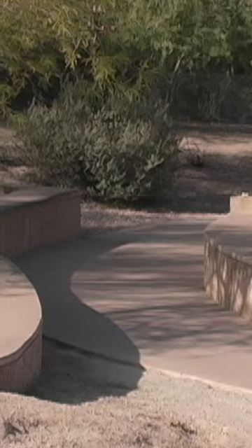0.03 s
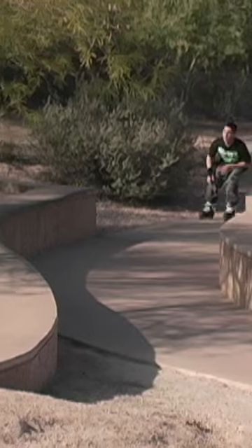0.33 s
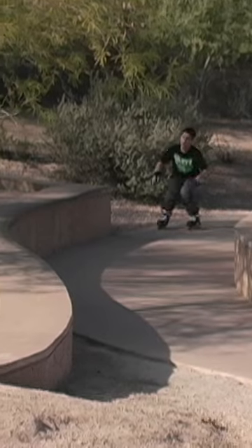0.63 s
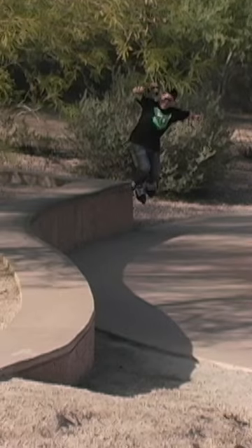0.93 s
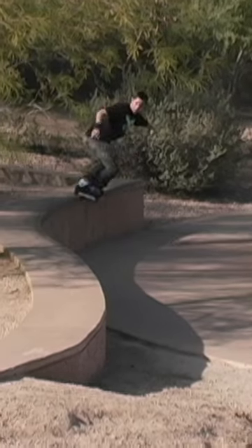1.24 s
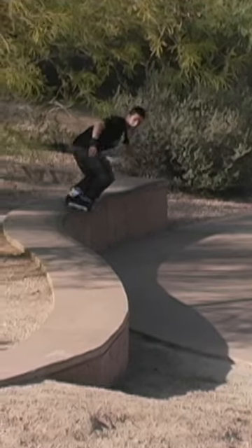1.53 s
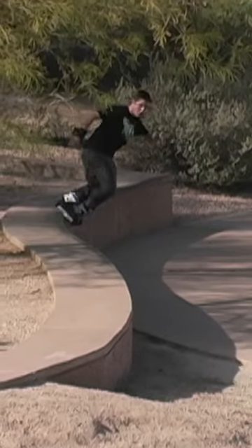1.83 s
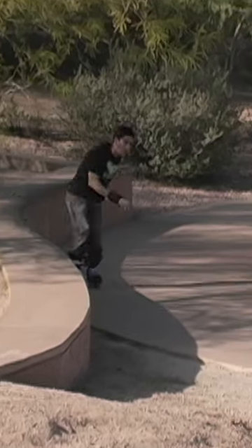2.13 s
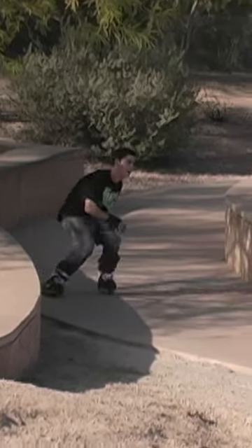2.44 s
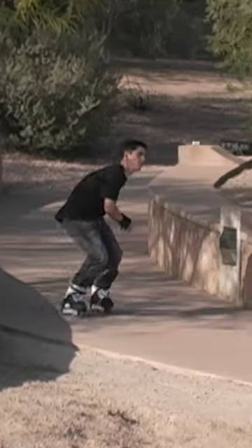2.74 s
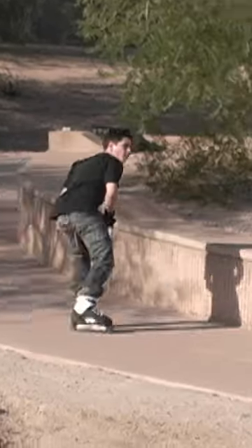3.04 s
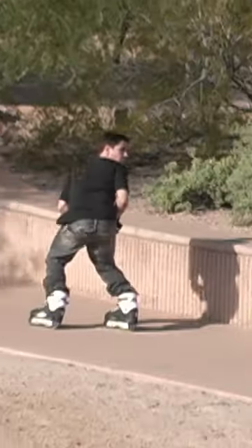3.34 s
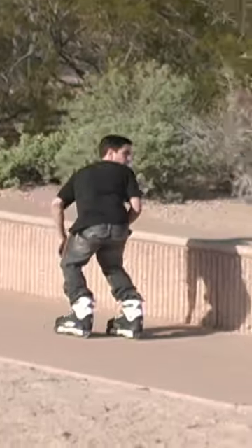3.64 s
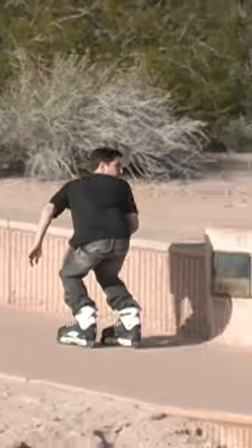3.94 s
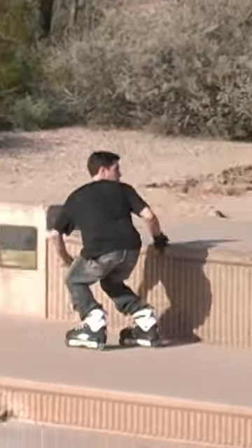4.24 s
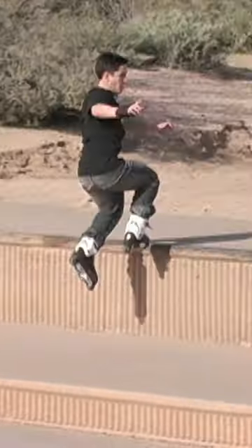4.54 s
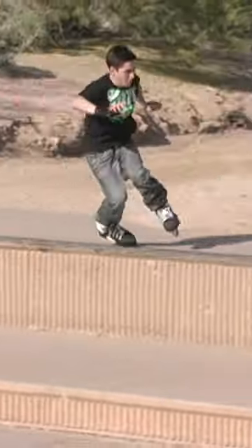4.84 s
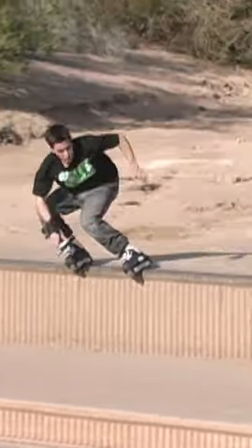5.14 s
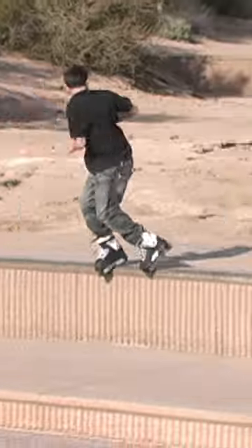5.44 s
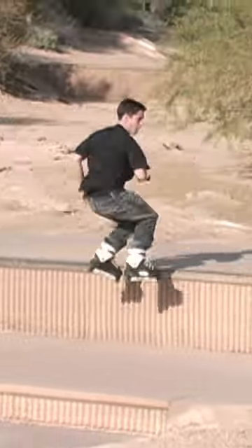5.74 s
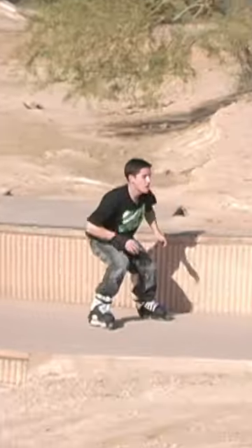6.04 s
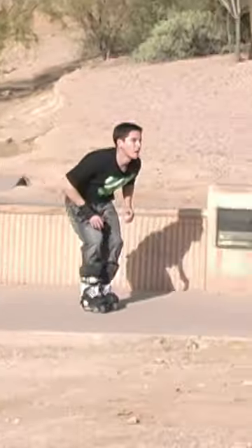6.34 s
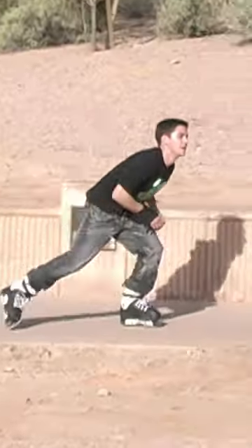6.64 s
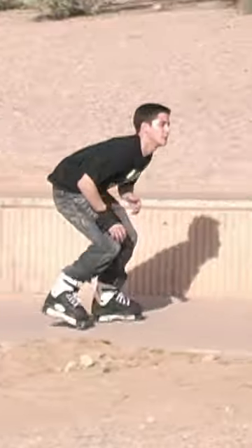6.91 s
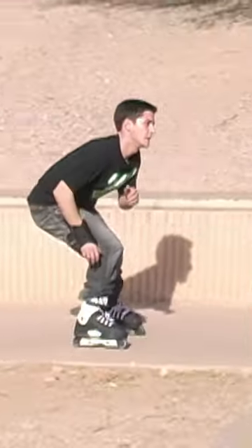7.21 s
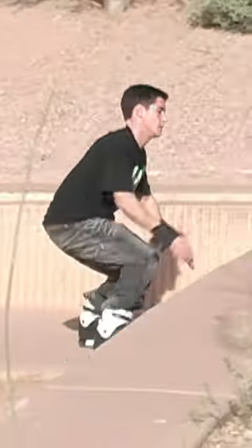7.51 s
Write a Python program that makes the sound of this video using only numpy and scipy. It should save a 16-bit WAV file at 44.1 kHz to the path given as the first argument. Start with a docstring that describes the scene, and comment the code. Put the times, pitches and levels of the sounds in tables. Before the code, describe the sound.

Inline skates roll over concrete, grind along ledges twice and land with a hard clack before rolling on.

```python
"""An inline skater rolls in over concrete, wheels rumbling and ticking across a joint, and jumps.
At 1.2 s his plastic soles bite into a ledge and grind, groaning and scraping as they stick and slip.
He drops off, rolls over more joints, and at 4.7 s locks on again for a second, two-part grind.
At 6 s he lands with a hard clack and strides on. All along a low wall throws back a short echo,
over far traffic, a distant engine's hum and a faint high whine. Only the left channel sounds."""
import sys
import numpy as np
from scipy import signal
from scipy.fft import rfft, irfft, next_fast_len
from scipy.io import wavfile
from scipy.ndimage import map_coordinates

SR = 44100
rng = np.random.default_rng(int(sys.argv[2]) if len(sys.argv) > 2 else 0)


def wrap_up_sound(samples):
    """Save the sound to the file named by the first command line argument, as 16-bit audio."""
    columns = np.atleast_2d(samples).T
    # keep every value between -1 and 1, then stretch to whole-number steps
    tamed = np.clip(columns, -1, 1)
    steps = np.round(tamed * 32767).astype(np.int16)
    wavfile.write(sys.argv[1], SR, steps)


N = 342657
TIME = np.arange(N) / SR
MS = 1 / 1000


# soles sliding on the ledge: lock-on t/s, release t/s, groan level/dB, scrape level/dB,
# load drift/(dB/s), pitch factor of the sole
SLIDES = [(1.208, 1.96, -48.5, -54, 9.5, 1.02), (4.723, 4.906, -46, -51.5, -20, 1.07),
          (4.992, 5.473, -38.5, -43.5, -6.5, 1.02)]
def sole_load():
    """Groan and scrape envelopes: the load drifts through each slide, and the first lock-on digs in."""
    groan, scrape = np.zeros((2, N))
    for start, end, groan_db, scrape_db, db_per_s, _ in SLIDES:
        drift = amp(db_per_s * (np.clip(TIME, start, end) - start))
        load = contact_gain(start, end, attack_s=0.0099, release_s=0.041) * drift
        groan += load * amp(groan_db)
        scrape += load * amp(scrape_db)
    bite_db = 12.5 * swell(SLIDES[0][0], half_width_s=0.16)
    return groan * amp(0.4 * bite_db), scrape * amp(bite_db)


def sole_pitch(sag_per_s=0.11):
    """Pitch bend of the sole: it resets at each lock-on and sags as the slide slows."""
    pitch = np.ones(N)
    for start, end, *_, factor in SLIDES:
        sag = np.exp(-sag_per_s * (np.clip(TIME, start, end) - start))
        pitch = np.where(TIME >= start, factor * sag, pitch)
    return pitch


# resonances of the plastic sole pressed on the edge: f/Hz, width/Hz, level/dB
SOLE_MODES = [(576, 220, -1), (997, 51, -3), (1415, 130, 1), (1662, 130, 1), (2290, 96, -0.5)]
# EQ of the boot's groan: f/Hz, level/dB
GROAN_EQ = [(60, 3.5), (140, 12), (230, 12.5), (340, -2.5), (560, 6), (780, -3), (1000, 5), (1400, 10),
            (1900, 7), (2300, -6), (2800, -22), (6000, -41)]
# EQ of the edge's scrape: f/Hz, level/dB
SCRAPE_EQ = [(1500, -14), (2600, -3), (3400, 4.5), (4200, 0.5), (5000, 3.5), (6500, -0.5), (8000, -3),
             (9200, -3.5), (10500, -8.5), (12200, -6), (15000, -30)]
# how keenly the edge cuts, from dull bite to sandy hiss: t/s, treble tilt/dB
KEENNESS = [(1.2, -18), (1.55, -2.5), (4.75, 7.5), (5.05, 10.5), (5.5, 1.5)]
def grinding():
    """Soles stick and slip on the ledge: a groan of wavering resonances under the scrape of the edge."""
    groan_gain, scrape_gain = sole_load()
    stick_slip, pitch = amp(2 * wobble(130)), sole_pitch()
    rub = asperities(per_s=1200, spread_db=4, smooth=0.11) * stick_slip
    sole = np.zeros(N)
    for hz, width_hz, db in SOLE_MODES:
        gain = amp(db + 1.6 * wobble(8.4))
        sole += gain * resonance(rub, hz * pitch * (1 + 0.035 * wobble(11)), width_hz)
    boot = colour(asperities(per_s=1400, spread_db=0.5, smooth=0.53) * stick_slip, GROAN_EQ)
    groan = unit(boot + amp(3) * unit(band(sole, "bandpass", (350, 2900))))
    edge = colour(asperities(per_s=1400, spread_db=4.5, smooth=0.95) * stick_slip, SCRAPE_EQ)
    hiss, tilt_db = treble(edge, 2900), automation(KEENNESS)
    scrape = (edge - hiss) * amp(-tilt_db / 2) + hiss * amp(tilt_db / 2)
    return groan * groan_gain + scrape * scrape_gain


# stretches on the pavement: touch-down t/s, lift-off t/s, rumble level/dB, grit level/dB
RUNS = [(0.204, 0.955, -62, -68), (2.254, 4.525, -53, -60.5), (5.99, 7.8, -48, -61)]
# bearing down in a landing, carve, stride or take-off:
# peak t/s, half width/s, rumble boost/dB, grit boost/dB
PUSHES = [(0.74, 0.085, 11.5, 10.5), (0.92, 0.04, 19.5, 10), (2.31, 0.095, 9, 12.5), (3.02, 0.1, 1, 3.5),
          (3.33, 0.12, 5, 5), (3.73, 0.06, 9.5, 10), (4.19, 0.078, 8, 7.5), (4.47, 0.26, -1, 8),
          (6.06, 0.08, 6, 9), (6.28, 0.065, 2.5, 10), (6.398, 0.0097, 5, 4.5), (6.57, 0.21, -1.5, 7.5),
          (6.84, 0.078, 0, 4.5), (7.06, 0.083, 6, 11), (7.22, 0.085, 1.5, 10), (7.412, 0.035, 7, 11)]
# one skate lifts between strides and the other runs lightly: t/s
LIFTS = [3.12, 6.465, 6.91]
def wheel_load():
    """Rumble and grit envelopes: open while the wheels are down, swelling on pushes, dipping on lifts."""
    gains = np.zeros((2, N))
    for start, end, *levels_db in RUNS:
        gains += np.outer(amp(levels_db), contact_gain(start, end, attack_s=0.0079, release_s=0.0091))
    push_db = sum(np.outer(boosts_db, swell(s, half_width)) for s, half_width, *boosts_db in PUSHES)
    lift_db = -9 * sum(swell(s, half_width_s=0.019) for s in LIFTS)
    return gains * amp(push_db + lift_db)


# EQ of the wheels' low rumble: f/Hz, level/dB
RUMBLE_EQ = [(30, -28), (80, -8.5), (130, -0.5), (220, 0.5), (320, -7), (450, -1.5), (600, -3), (800, -13),
             (1300, -43), (3000, -60)]
# EQ of the frames' midrange buzz: f/Hz, level/dB
BUZZ_EQ = [(300, 4.5), (700, 1.5), (950, 13.5), (1500, 12), (2000, 8), (2300, 11.5), (2700, -2),
           (5000, -19)]
# EQ of the crunching grit: f/Hz, level/dB
GRIT_EQ = [(1500, -8), (2600, -1.5), (3300, 5), (4000, 3), (5000, 4), (7200, 2), (8300, -4.5), (9300, -3),
           (10500, -8.5), (12300, -3.5), (14000, -40), (16000, -56)]
def rolling():
    """Wheels rumble over bumps, crunch fine grit and tick on pebbles; the frames buzz in the mids."""
    rumble_gain, grit_gain = wheel_load()
    buzz_gain = np.sqrt(rumble_gain * grit_gain)
    bumps = wobble(70)
    rumble = colour(rng.standard_normal(N) * amp(2.66 * bumps), RUMBLE_EQ)
    buzz = colour(asperities(per_s=2500, spread_db=3, smooth=0.94) * amp(2 * bumps), BUZZ_EQ)
    grit = colour(asperities(per_s=2500, spread_db=6.5, smooth=1) * amp(1.8 * bumps), GRIT_EQ)
    pebbles = unit(band(asperities(per_s=45, spread_db=4, smooth=0), "bandpass", (1200, 6500)))
    crunch = amp(2.8) * grit + amp(-8) * pebbles
    return amp(-2) * rumble * rumble_gain + amp(0.5) * buzz * buzz_gain + crunch * grit_gain


# modes of boot shell and frame: f/Hz, level/dB, t60/s
BOOT_MODES = [(195, 2, .04), (420, 3, .04), (580, -1, .025), (853, 4, .035), (1130, -7, .025),
              (1440, 4, .045), (1740, -4, .035), (3090, -4, .03), (3500, -10, .02), (3950, -7, .025),
              (4480, -6, .03), (5050, -2, .045), (6340, -12, .02), (7310, -9, .02), (9300, -10, .012)]
def boot_ring(t, contact_s):
    """The struck boot rings: a brief touch is bright and uneven, a flat landing drives every mode."""
    hz, db, t60 = np.transpose(BOOT_MODES)[:, :, None]
    hz = hz * (1 + 0.008 * rng.standard_normal(hz.shape))
    briefness = 1 / (1 + contact_s / (3 * MS))
    uneven_db = 4 * briefness * rng.standard_normal(hz.shape)
    decay_db = -60 * np.maximum(t - contact_s / 2, 0) / t60
    strength = amp(db + uneven_db + decay_db) * (hz / 1000) ** (1.29 * briefness)
    ring = np.sum(strength * np.sin(2 * np.pi * (hz * t + rng.random(hz.shape))), axis=0)
    attack = 1 - np.exp(-t / (0.092 * contact_s))
    return unit(ring * attack)


# EQ of a skate's crack on concrete: f/Hz, level/dB
CRACK_EQ = [(50, 5.5), (150, -1), (300, -12.5), (480, -4), (750, -9.5), (1000, 1.5), (1500, 5), (2500, -10),
            (3300, 1), (4200, -1.5), (5000, 0), (6200, -1), (7500, 1), (10500, -10.5), (12500, -8),
            (15500, -31)]
def impact(contact_s, levels_db, ring_db, crack_t60=0.024, rattle_t60=0.11):
    """One hit: a snap at first touch, a crack while contact lasts, then the boot rings and rattles."""
    t = np.arange(SR // 8) / SR
    ring = amp(ring_db) * boot_ring(t, contact_s)
    noise = colour(rng.standard_normal(len(t)), CRACK_EQ)
    crack = noise * amp(-60 * np.maximum(t - contact_s, 0) / crack_t60)
    rattle = band(noise, "bandpass", (450, 6500)) * amp(-8.5 - 60 * t / rattle_t60)
    snap = unit(band(signal.unit_impulse(len(t)), "bandpass", (1300, 7500)))
    snap *= amp(0.5) / (1 + contact_s / (2 * MS))  # the longer the contact, the softer the snap
    hit = band(unit(crack + rattle) + snap + ring, "bandpass", (115, 13500), order=3)
    thud = band(hit, "lowpass", 700, order=3)
    clack = band(hit, "bandpass", (700, 2600), order=3)
    click = band(hit, "highpass", 2600, order=3)
    mix = sum(amp(db) * unit(part) for db, part in zip(levels_db, (thud, clack, click)))
    return mix * np.sqrt(10 * MS * SR / len(t))  # levels count as if the energy fell within 10 ms


def impacts(rows, tone_db):
    """A track of hits voiced by tone_db (thud, clack, click); harder, longer hits ring the boot more."""
    out = np.zeros(N + SR)
    for s, contact_ms, db, bright_db in rows:
        levels_db = db + np.array(tone_db) + [-bright_db, 0, bright_db]
        ring_db = 0.3 * (max(levels_db) + 20) + 0.2 * contact_ms - 5.5
        hit = impact(max(contact_ms, 0.5) * MS, levels_db, ring_db)
        out[round(s * SR):][:len(hit)] += hit
    return out[:N]


# skate clacks and ticks, one doubled by a quick echo off the wall:
# t/s, contact/ms, level/dB, brightness/dB
CLACKS = [(0.305, 3.1, -48, -8.5), (2.2514, 2, -33, -2), (2.329, 9.6, -37, -1), (2.351, 7, -39, 2),
          (3.217, 2.9, -39.5, 3.5), (3.447, 1.5, -43, 6), (4.183, 4.3, -32.5, 3.5), (4.326, 3.5, -44, 2),
          (4.477, 8, -47, 6), (5.9684, 11.5, -16.5, 1), (6.087, 3.8, -30, 3.5), (6.1151, 1.2, -32, -2.5),
          (6.1327, 2.2, -33.5, 7.5), (6.166, 4.8, -37, 1), (6.581, 0.46, -34.5, -0.5),
          (6.6417, 2, -30, 0.5), (6.6505, 2.9, -30.5, 0.5), (6.7012, 7.5, -31, 1), (6.944, 1.9, -37.5, 0.5),
          (7.023, 7.4, -34, -1), (7.212, 15.5, -37.5, 2), (7.241, 2.3, -36, -1), (7.691, 16.5, -44, -8.5)]
# pavement joints: t/s, lag of the second skate/s, level/dB, brightness/dB
JOINTS = [(0.706, 0.049, -43, -0.5), (2.749, 0.048, -42.5, 2.5), (3.264, 0.043, -40, 3.5),
          (3.737, 0.033, -36.5, 3), (4.166, 0.041, -37, 6)]
def wheel_hits(joint_contact_ms=3.1, second_skate_db=4.5):
    """Dull urethane wheels clack and tick; at a joint the weighted second skate hits harder."""
    ticks = [(s + skate * lag, joint_contact_ms, db + skate * second_skate_db, bright_db)
             for s, lag, db, bright_db in JOINTS for skate in (0, 1)]
    return impacts(CLACKS + ticks, tone_db=(-1.5, -0.5, -4.5))


# frames striking the concrete: t/s, contact/ms, level/dB, brightness/dB
KNOCKS = [(1.207, 1.2, -42.5, -1), (1.224, 5.8, -37, -5), (1.2432, 0.43, -31.5, -4.5), (1.323, 3, -41, -4),
          (1.804, 2, -38, 5.5), (1.862, 4.4, -35.5, -2.5), (1.884, 4.5, -35.5, -0.5),
          (2.255, 7.7, -25.5, -4), (4.71, 1.3, -31, 0.5), (4.78, 1.2, -30, 3), (4.986, 1.4, -32, 4.5),
          (5.0625, 0.62, -29, 1), (5.073, 1.3, -35, 2), (5.1148, 0.9, -34.5, 9),
          (5.1563, 0.49, -23.5, -1.5), (5.164, 2.9, -35, 7), (5.168, 0.95, -34.5, 10.5),
          (5.184, 1.1, -33, 4.5), (5.2558, 1.4, -28.5, 2)]
def frame_knocks():
    """Hard plastic frames knock with less thud and more click than the wheels."""
    return impacts(KNOCKS, tone_db=(-9, -0.5, -2))


# the skater's weight coming down on a boot: t/s, relative level/dB
THUMPS = [(4.712, -37.5), (4.744, -41), (4.778, -37), (4.985, -35), (5.039, -40), (5.158, -35.5),
          (6.158, -42), (6.704, -44), (7.214, -40), (7.691, -36)]
def thumps(t60=0.083):
    """Low end under the clacks: boot and leg bounce for a few slow cycles."""
    out, t = np.zeros(N + SR), np.arange(SR // 8) / SR
    for s, db in THUMPS:
        hz = 135 * np.exp(0.19 * rng.standard_normal())
        out[round(s * SR):][:len(t)] += amp(db + 6 - 60 * t / t60) * np.sin(2 * np.pi * hz * t)
    return out[:N]


def wheel_squeak():
    return noise_sweep(span_s=(0.944, 0.956), span_hz=(9500, 7200), width_hz=530, db=-53.5)


def landing_whirr():
    """A faint whirr falls in pitch after the hard landing."""
    return noise_sweep(span_s=(6.21, 6.55), span_hz=(750, 520), width_hz=34, db=-52)


# the top end opens as the skater nears and passes side-on: t/s, shelf level/dB
SHEEN = [(0.5, -5), (1.5, -11.5), (2.3, -4), (4, -4), (5.2, -7), (6.3, 1.5), (7.2, 1), (7.7, 1.5)]
def sheen(x):
    """A moving high shelf: the top treble is beamed, so it comes and goes with the skater's place."""
    return x + (amp(automation(SHEEN)) - 1) * treble(x, 6030)


# the gap between skater and low wall: t/s, distance/m
WALL_DISTANCE = [(2.2, 0.48), (3.2, 0.84), (4.5, 0.66), (5.9, 0.6), (6.2, 1), (7.7, 2.3)]
def wall_echo(x, gain=0.11, sound_m_per_s=343):
    """Adds one moving reflection, which doubles the ticks and sweeps a comb through the rolling."""
    delay_s = 2 * automation(WALL_DISTANCE) / sound_m_per_s
    echo = map_coordinates(x, [(TIME - delay_s) * SR])
    return (x + gain * echo) / np.sqrt(1 + gain ** 2)


# EQ of the outdoor reverb: f/Hz, level/dB
TAIL_EQ = [(100, 1), (400, -10), (1500, -7.5), (5000, -10), (14000, -4)]
def scatter(x, wet_db, t60):
    """Banks and bushes return a weak, diffuse tail."""
    t = np.arange(SR // 2) / SR
    tail = colour(rng.standard_normal(len(t)), TAIL_EQ)
    tail *= amp(-60 * t / t60) * (1 - np.exp(-t / 0.0025))
    return amp(wet_db) * signal.fftconvolve(x, tail / np.linalg.norm(tail))[:N]


# EQ of far traffic: f/Hz, level/dB
TRAFFIC_EQ = [(20, -26), (32, -13), (45, 1), (70, 2), (110, 1), (170, -2), (270, -5), (450, -12.5),
              (620, -10.5), (800, -12.5), (1200, -13.5), (2000, -19), (3000, -25.5), (5500, -29.5),
              (8000, -35.5), (15000, -39.5)]
# partials of a thin, steady whine: f/Hz
WHINE_PARTIALS = [4770, 4780, 4840, 5630]
def background():
    """The ambience bed: far traffic, the unsteady hum of a distant engine and a faint whine."""
    traffic = amp(-52 + 0.19 * wobble(2.45)) * colour(rng.standard_normal(N), TRAFFIC_EQ)
    hum_hz = 150.3 + 1.62 * wobble(11)
    hum = amp(-55 + 0.6 * wobble(5.6)) * unit(np.sin(2 * np.pi * np.cumsum(hum_hz) / SR))
    whine = amp(-78.5) * unit(sum(np.sin(2 * np.pi * hz * TIME) for hz in WHINE_PARTIALS))
    return traffic + hum + whine


def asperities(per_s, spread_db, smooth):
    """Friction texture: tiny, unequal impacts on the grains of concrete, over a smooth rub."""
    struck = rng.random(N) < per_s / SR
    sizes = amp(spread_db * np.minimum(rng.exponential(size=N), 4)) * rng.choice([-1, 1], N)
    return unit(struck * sizes) + smooth * rng.standard_normal(N)


def noise_sweep(span_s, span_hz, width_hz, db):
    """A narrow band of noise that swells, glides and fades."""
    envelope = np.sin(np.pi * np.interp(TIME, span_s, (0, 1)))
    hz = np.interp(TIME, span_s, span_hz)
    return amp(db) * envelope * resonance(rng.standard_normal(N), hz, width_hz)


def contact_gain(start, end, attack_s, release_s):
    """Rises at first touch, holds, and dies away once the skate has left."""
    return np.clip((TIME - start) / attack_s, 0, 1) * np.exp(-np.maximum(TIME - end, 0) / release_s)


def swell(peak_s, half_width_s):
    """A smooth rise and fall of height 1."""
    return np.exp(-((TIME - peak_s) / half_width_s) ** 2)


def automation(points):
    """Straight ramps through (t/s, value) points."""
    return np.interp(TIME, *np.transpose(points))


def wobble(knots_per_s):
    """A smooth random modulator."""
    return map_coordinates(rng.standard_normal(int(N * knots_per_s / SR) + 4), [TIME * knots_per_s])


def colour(x, eq):
    """x through an EQ of (f/Hz, level/dB) points on a log axis, at rms 1."""
    eq_hz, db = np.transpose(eq)
    size = next_fast_len(len(x))
    hz = np.fft.rfftfreq(size, 1 / SR)
    gain = amp(np.interp(np.log(hz + 1), np.log(eq_hz), db))
    return unit(irfft(rfft(x, size) * gain, size)[:len(x)])


def resonance(x, hz, width_hz):
    """x through a resonance whose centre may move, at rms 1."""
    turn = np.exp(2j * np.pi * np.cumsum(hz) / SR)
    pole = np.exp(-np.pi * width_hz / SR)
    return unit((turn * signal.lfilter([1], [1, -pole], x / turn)).real)


def band(x, kind, edge_hz, order=2):
    """A causal low-, high- or band-pass."""
    return signal.sosfilt(signal.butter(order, edge_hz, kind, fs=SR, output="sos"), x)


def treble(x, edge_hz):
    """The part of x above edge_hz."""
    hz = np.fft.rfftfreq(N, 1 / SR)
    return irfft(rfft(x) / (1 + (edge_hz / (hz + 1)) ** 6), N)


def amp(db):
    """Decibels to gain."""
    return 10 ** (np.asarray(db) / 20)


def unit(x):
    """x at rms 1."""
    return x / np.sqrt(np.mean(x ** 2) + 1e-20)


def scene():
    """The mix: skates, their reflections and the ambience bed, panned hard left."""
    skates = wheel_hits() + frame_knocks() + rolling() + landing_whirr() + grinding()
    skater = wall_echo(sheen(skates)) + thumps() + wheel_squeak()
    mono = skater + scatter(skater, wet_db=-18, t60=1.0) + background()
    return np.array([2 * mono, np.zeros(N)])


def record(dry, start_s=0.268, ceiling=0.98, top_hz=15950):
    """The master: a moment of silence, then the mix cuts in, soft-clipped and steeply low-passed."""
    gated = dry * (TIME >= start_s)
    rounded = gated / (1 + np.abs(gated / ceiling) ** 6) ** (1 / 6)
    size = next_fast_len(N + SR // 2)
    passband = np.fft.rfftfreq(size, 1 / SR) < top_hz
    return irfft(rfft(rounded, size) * passband, size)[:, :N]


dry = scene()
out = record(dry)
wrap_up_sound(out)
```